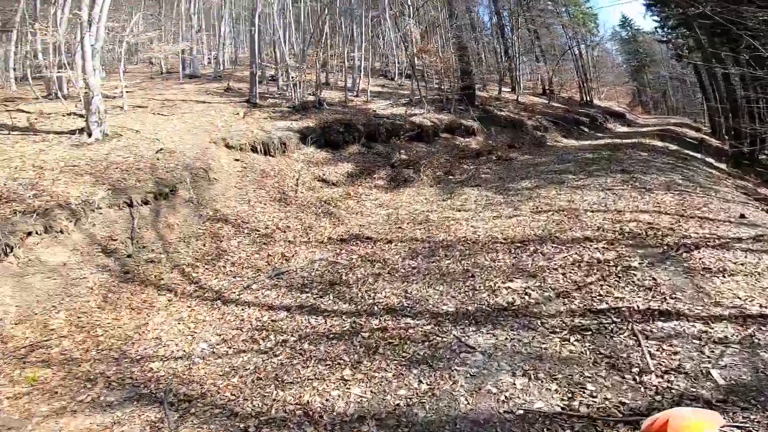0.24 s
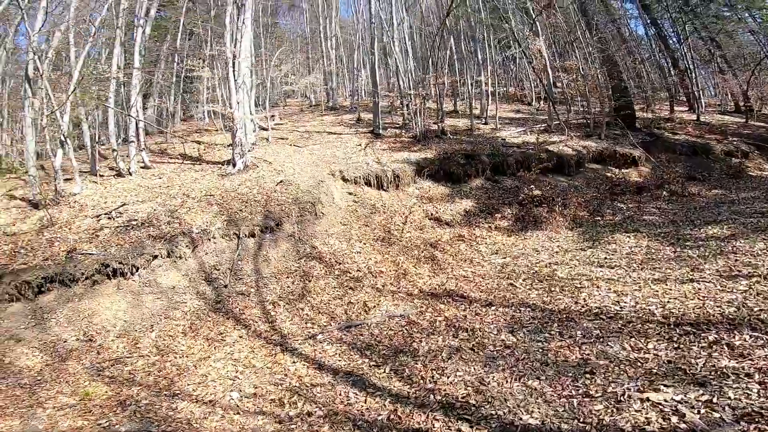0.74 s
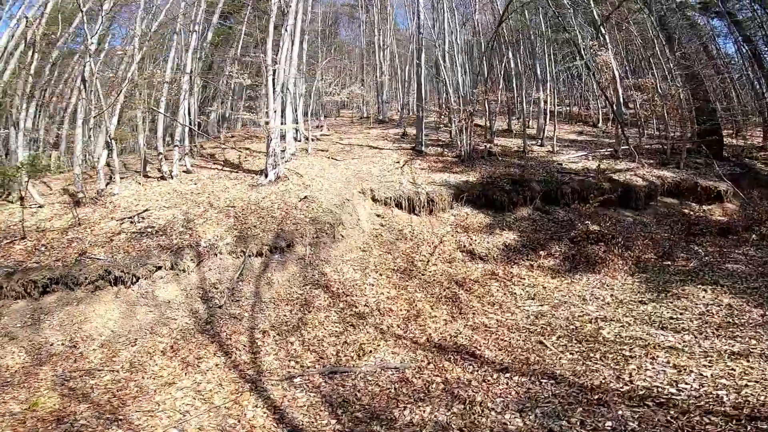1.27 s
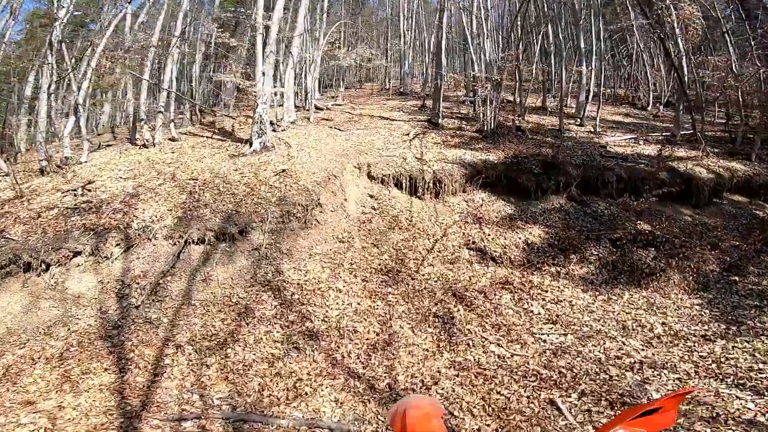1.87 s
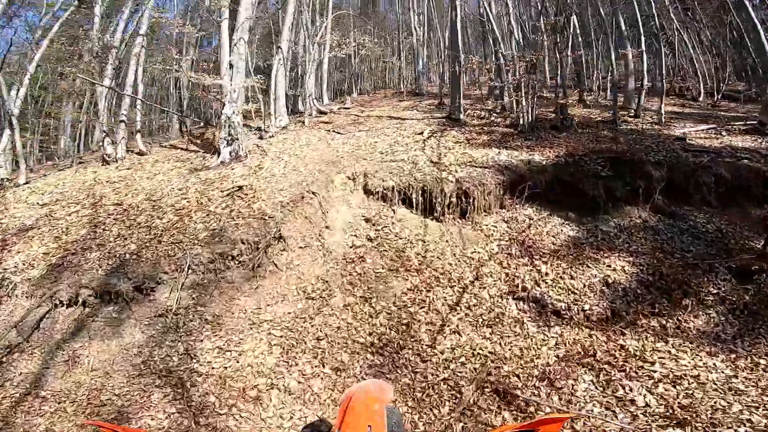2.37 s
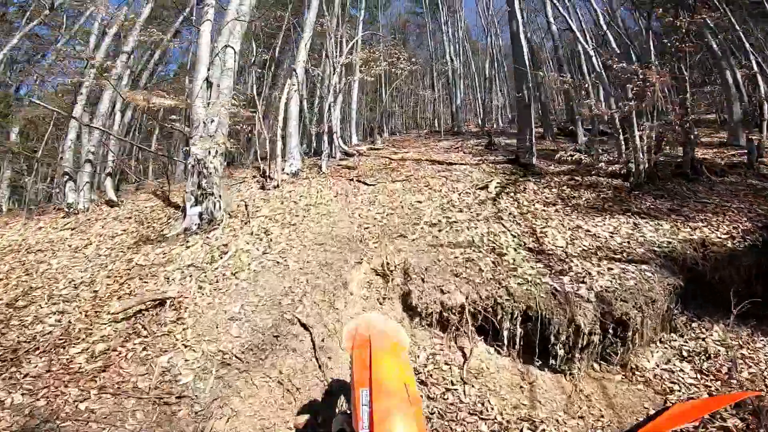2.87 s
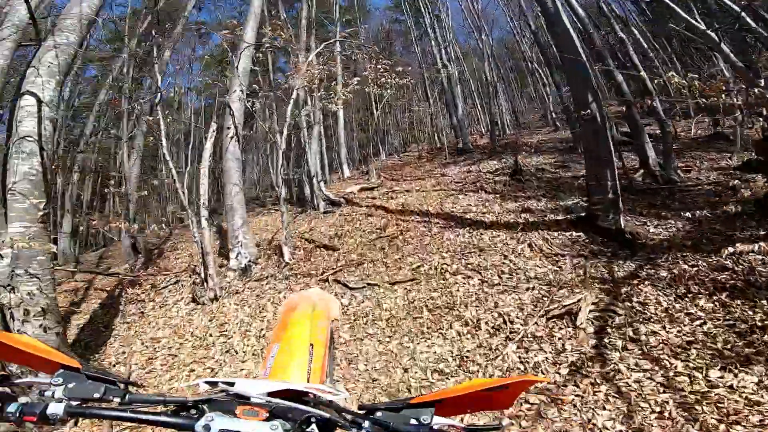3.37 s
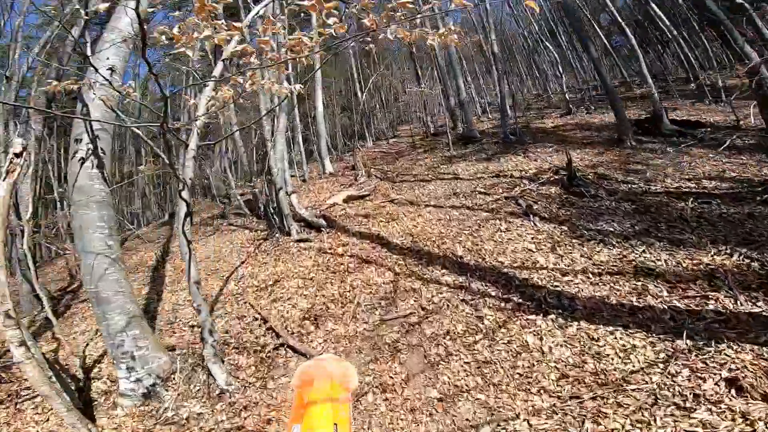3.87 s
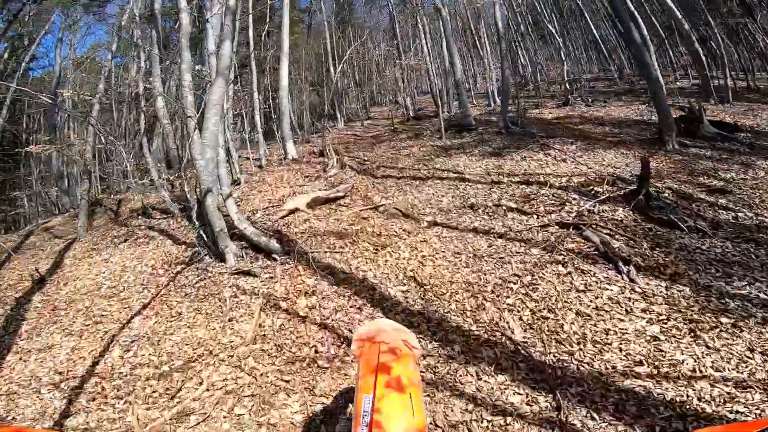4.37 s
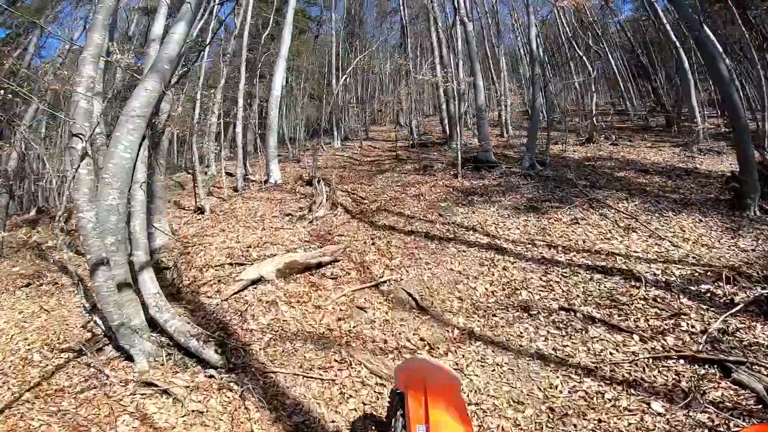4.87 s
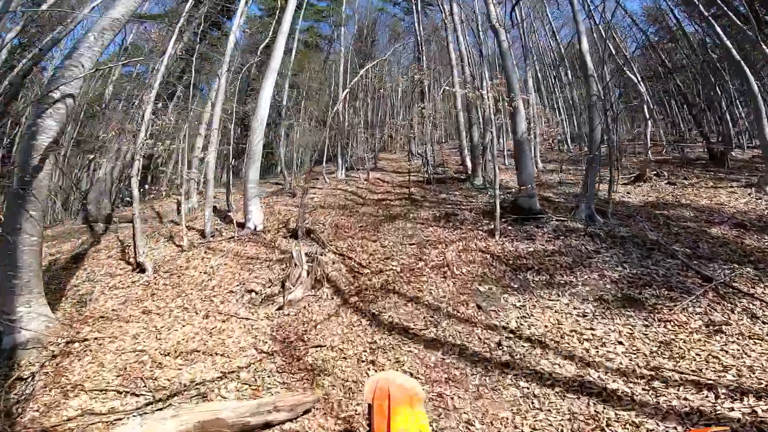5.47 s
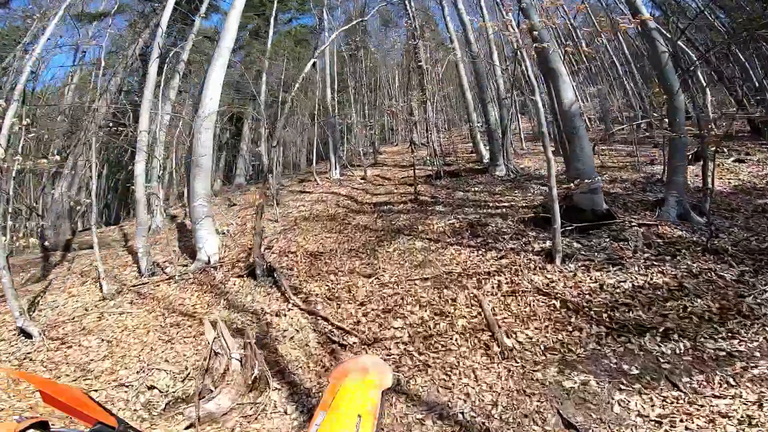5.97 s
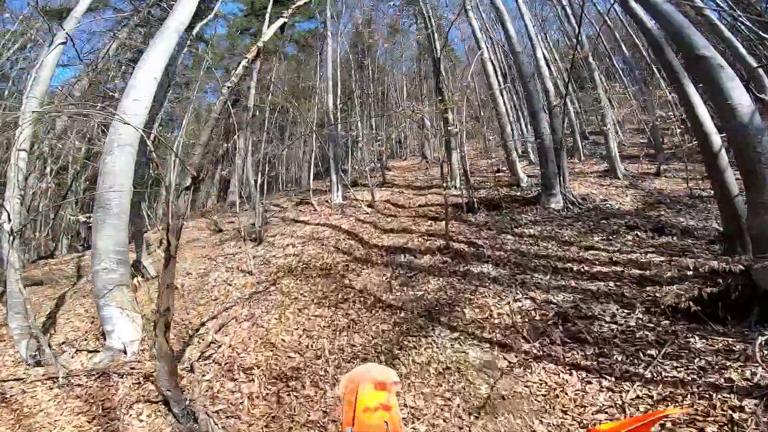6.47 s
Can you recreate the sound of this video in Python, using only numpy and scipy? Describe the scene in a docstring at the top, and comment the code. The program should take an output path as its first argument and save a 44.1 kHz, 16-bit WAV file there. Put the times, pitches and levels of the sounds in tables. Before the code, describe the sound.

A two-stroke dirt bike pops slowly near idle, then revs up and down in raspy surges, tyres rustling through dry leaves, heard from the rider's helmet.

```python
"""A two-stroke enduro bike climbs a leafy forest slope, heard from the rider's helmet.
It chugs near idle with single pops, then revs up and down: every turn of the crank sends pulses
through airbox and exhaust, and makes piston, cylinder, pipe wall and crankcase clatter and ring.
The tyres rustle as filtered noise in fine grains, over a dull noise rumble; chain and chassis knock
as short bursts of noise."""
import sys
import numpy as np
from scipy import signal
from scipy.fft import rfft, irfft, next_fast_len
from scipy.io import wavfile
from scipy.ndimage import uniform_filter1d

SR = 44100
rng = np.random.default_rng(int(sys.argv[2]) if len(sys.argv) > 2 else 0)


def to_wav(s):
    """Save 16-bit WAV."""
    ch = np.atleast_2d(s).T  # columns
    pcm = np.round(np.clip(ch, -1, 1) * 32767)  # PCM
    wavfile.write(sys.argv[1], SR, pcm.astype(np.int16))


N = 296345
TIME = np.arange(N) / SR   # seconds

# Lone firings near idle. Each row: start in seconds, strength in dB before the pop's own gain.
LONE_FIRINGS = [(0.161, -14.5), (0.331, -13.5), (0.485, -9.5), (0.638, -9.5), (0.749, -8.5), (0.855, -6.5),
                (0.928, -18), (0.965, -10.5)]
# How the two microphone ports differ. Each row: frequency in Hz, likeness from 0 to 1,
# left minus right in dB, lead of the left in radians.
PORT_DIFFERENCES = [(100, 0.998, 0.1, 0.048), (250, 0.998, -0.05, 0.08), (500, 1, 1, 0.33),
                    (770, 0.92, 3, 0.29), (1080, 1, 4.5, -0.86), (1360, 0, 3.5, 0.059), (1860, 1, 3, -1.22),
                    (2540, 0.93, 1, 0.72), (3550, 0.91, 3, -0.22), (5000, 0.89, 1.5, -0.81),
                    (7000, 0.3, 0.5, 0.66), (9100, 1, 2.5, 1.43)]
# Effort of the engine, heard as the boom of its airbox. Each row: time in seconds, level in dB before trims.
ENGINE_EFFORT = [(0, -33.5), (.35, -33), (.92, -24), (1.02, -14), (1.5, -12.5), (2.12, -18.5), (2.3, -14.5),
                 (3.15, -9.5), (3.58, -17.5), (3.72, -14), (4.05, -16), (4.24, -12.5), (4.62, -18.5),
                 (4.9, -14), (6.12, -12), (6.25, -14.5), (6.6, -11), (6.72, -14)]


def from_db(db):
    """Turn decibels into a plain gain."""
    return 10 ** (np.asarray(db) / 20)


def rms_one(x):
    """Scale a sound to an rms level of 1."""
    return x / np.sqrt(np.mean(x ** 2) + 1e-20)


def in_time(rows):
    """Draw each column of a time table as a curve with a value at every sample."""
    s, *columns = np.transpose(rows)
    return [np.interp(TIME, s, column) for column in columns]


def per_bin(points, axis=1):
    """Read one column of a spectrum table at every FFT frequency, along a log scale."""
    table = np.transpose(points)
    hz = np.fft.rfftfreq(next_fast_len(N), 1 / SR)
    return np.interp(np.log(hz + 1), np.log(table[0]), table[axis])


def shaped(x, gain):
    """Filter by one gain per FFT frequency."""
    size = next_fast_len(N)
    return irfft(rfft(x, size) * gain, size)[..., :N]


def cut(x, hz, kind, order=2):
    """Smooth low-pass or band-pass filter."""
    return signal.sosfilt(signal.butter(order, hz, kind, fs=SR, output="sos"), x)


def evened(x, size=3500):
    """Hold the slow level near rms 1 but keep the single pulses; size is in samples."""
    power = uniform_filter1d(uniform_filter1d(x ** 2, size), size)
    return x / np.sqrt(np.abs(power) + 1e-12)


def drift(rate):
    """Random wandering with rms 1: chance points, so many a second, joined by straight lines."""
    return rms_one(np.interp(TIME * rate, np.arange(4000), rng.standard_normal(4000)))


def resonate(x, modes):
    """Ring resonances side by side with alternating signs; modes hold Hz, width in Hz, dB."""
    out = 0
    for k, (hz, width, db) in enumerate(modes):
        r = np.exp(-np.pi * width / SR)
        poles = [1, -2 * r * np.cos(2 * np.pi * hz / SR), r * r]
        ring = (1 - r * r) / 2 * signal.lfilter([1, 0, -1], poles, x + 1e-18)
        out = out + (-1) ** k * from_db(db) * ring
    return out


def voiced(source, modes, band_hz, level):
    """Ring a group of resonances, keep their band and follow their level curve."""
    return from_db(in_time(level)[0]) * evened(cut(resonate(source, modes), band_hz, "band"))


def stereo_noise():
    """Two channels of noise, as alike at each frequency as the port table says."""
    alike = np.clip(per_bin(PORT_DIFFERENCES), 0, .999)
    mid, side = rng.standard_normal((2, N))
    return mid + shaped(side, np.sqrt((1 - alike) / (1 + alike))) * np.array([[1], [-1]])


def per_turn(turns):
    """One bell-curve random number held for each turn of the crank."""
    return rng.standard_normal(1000)[np.floor(turns).astype(int) + 2]


def impulses(rows):
    """One single-sample click for each row of seconds and dB."""
    clicks = np.zeros(N)
    for s, db in rows:
        clicks[round(s * SR)] = from_db(db)
    return clicks


def dying(clicks, decay_s):
    """An exponential fade after each click."""
    return signal.lfilter([1], [1, -np.exp(-1 / (decay_s * SR))], clicks + 1e-18)


def crank_speed():
    """Turns per second: the rider's revs, with a short lurch after every lone firing."""
    # Each row: time in seconds, crank speed in turns per second before the lurches.
    rider_revs = [(0.0, 43.47), (0.12, 25.12), (0.29, 21.23), (0.45, 22.98), (0.53, 25.38), (0.62, 22.02),
                  (0.78, 26.77), (0.93, 18.97), (1.12, 34.97), (1.4, 60.44), (1.56, 63.54), (1.8, 50.13),
                  (1.92, 39.38), (2.0, 36.14), (2.12, 36.34), (2.28, 42.82), (2.52, 44.63), (2.76, 52.07),
                  (2.88, 64.63), (2.96, 67.22), (3.04, 67.65), (3.24, 60.3), (3.4, 56.1), (3.44, 60.59),
                  (3.48, 55.99), (3.6, 44.26), (3.64, 44.8), (3.72, 49.62), (3.76, 50.59), (3.8, 46.42),
                  (3.96, 43.77), (4.0, 46.84), (4.08, 43.43), (4.12, 48.8), (4.16, 60.16), (4.2, 62.12),
                  (4.28, 50.83), (4.32, 53.59), (4.36, 51.31), (4.4, 42.43), (4.48, 46.72), (4.56, 37.75),
                  (4.64, 33.82), (4.68, 34.3), (4.84, 52.24), (4.92, 51.86), (5.0, 58.63), (5.08, 56.09),
                  (5.28, 54.94), (5.44, 59.59), (5.56, 67.69), (5.64, 72.4), (5.8, 66.22), (5.84, 62.38),
                  (6.0, 65.19), (6.08, 69.5), (6.16, 63.05), (6.2, 56.46), (6.24, 54.17), (6.4, 56.52),
                  (6.52, 60.67), (6.64, 71.33), (6.72, 76.35)]
    kick_revs, kick_s = 6, .022   # turns per second gained, seconds until the top of the kick
    ages = [np.maximum(TIME - s, 0) / kick_s for s, _ in LONE_FIRINGS]
    return in_time(rider_revs)[0] + kick_revs * sum(age * np.exp(1 - age) for age in ages)


def spluttering():
    """How strongly the engine splutters as the throttle snaps shut or open."""
    # Each row: middle in seconds, half length in seconds, strength from 0 to 1.
    splutters = [(3.531, 0.068, 1), (4.196, 0.051, 0.36), (4.748, 0.039, 0.5), (5.005, 0.022, 0.7),
                 (6.184, 0.04, 0.48)]
    return sum(depth * np.exp(-((TIME - s) / length) ** 2) for s, length, depth in splutters)


def gas_pulses(angle, throttle, smear, share, count):
    """One pulse a turn from crank orders, spread over the angle as the ports open and close."""
    # Port timing favours some crank orders (multiples of the crank speed), one row each from the third up.
    # Each row: dB at open throttle, dB at closed throttle, both before weighting by throttle and share.
    order_gains = [(-2.5, 9), (18, 2.5), (10, 3.5), (-16, 7), (13, -0.5), (7.5, 3.5), (-0.5, 6),
                   (-5.5, -1.5)]
    gains = [from_db(share * (throttle * open_db + (3.0 - throttle) * shut_db))
             for open_db, shut_db in order_gains]
    gains += [from_db(1.0)] * count   # the higher orders are even
    orders = zip(range(3, count), gains)
    return rms_one(sum(gain * np.cos(k * angle - smear * (k - 5) ** 2 / 2) for k, gain in orders))


def pumping(angle, revs, ragged, splutter):
    """The piston pumps smoothly once and twice a turn, through the standing waves of the pipe."""
    # The engine lugs out of the hollow, which swells its pumping. Each row: time in seconds, gain in dB.
    lug = [(0, 4), (1.1, -2.5), (1.7, -1), (2.1, -2), (2.8, -1), (3.2, -11), (3.7, -3), (4.4, -4.5),
           (5.0, -3.5), (6.72, -8)]
    # Strength once a turn. Each row: frequency in Hz, dB against effort plus lug.
    once_a_turn = [(27, -11.5), (45, -16), (58, -14.5), (72, -24)]
    # Strength twice a turn. Each row: frequency in Hz, dB against effort plus lug.
    twice_a_turn = [(50, -11), (70, -3.5), (90, -6), (108, -8), (122, -14.5), (138, -6.5)]
    base_db = in_time(ENGINE_EFFORT)[0] + in_time(lug)[0]
    first_db = base_db + np.interp(revs, *np.transpose(once_a_turn))
    second_db = base_db + np.interp(2 * revs, *np.transpose(twice_a_turn))
    pump = np.sqrt(2) * (from_db(second_db) * np.sin(2 * angle) + from_db(first_db) * np.cos(angle))
    waver_db = .6 + .6 * ragged + 2.5 * splutter
    return pump * from_db(waver_db * drift(40))


def airbox_boom(angle, strength, throttle, turbulence):
    """Long intake gulps and rushing air ring in the airbox."""
    # Each row: frequency in Hz, width in Hz, relative gain in dB.
    airbox_modes = [(239.9, 59, 3), (300.3, 49, 4.5), (321.8, 50.5, -1)]
    intake_turn = 0.021   # the intake runs ahead, in turns
    hollow_hz, hollow_width_hz = 156, 45
    boom_trim_db = -0.1
    smear = 0.048 - 0.46 * (1 - throttle) ** 2
    gulps = strength * gas_pulses(angle + 2 * np.pi * intake_turn, throttle, smear, 0.83, count=13)
    # the airbox is hollow below its main resonance
    notch = signal.iirnotch(hollow_hz, hollow_hz / hollow_width_hz, fs=SR)
    intake = signal.lfilter(*notch, gulps + 1.7 * turbulence)
    boom = evened(cut(resonate(intake, airbox_modes), 586, "low"))
    return from_db(in_time(ENGINE_EFFORT)[0] + boom_trim_db) * boom


def exhaust_honk(pulses, turbulence):
    """Short exhaust pulses and turbulence honk in the pipe near 470 Hz."""
    # Each row: frequency in Hz, width in Hz, relative gain in dB.
    honk_modes = [(377.5, 49, 2), (518, 57, 3.2)]
    # Each row: time in seconds, level in dB before the trim.
    honk_level = [(0.0, -35), (0.41, -41.5), (0.49, -31), (0.52, -35), (0.65, -33.5), (0.82, -39),
                  (0.86, -25), (0.88, -35.5), (1.31, -25), (1.57, -19), (1.91, -39.5), (2.92, -23),
                  (3.42, -25.5), (3.46, -42), (4.32, -22), (4.38, -30), (4.7, -35.5), (4.88, -18.5),
                  (5.09, -28.5), (5.2, -22.5), (5.99, -23), (6.12, -28.5), (6.29, -24.5), (6.72, -26)]
    honk_trim_db = -2
    return from_db(honk_trim_db) * voiced(pulses + turbulence, honk_modes, [360, 620], honk_level)


def pipe_drone(pulses, angle, revs, idling):
    """A hollow tone of the pipe; at low revs it also sings at nine times the crank speed."""
    # Each row: frequency in Hz, width in Hz, relative gain in dB.
    drone_modes = [(324, 40, 0)]
    # Each row: time in seconds, level in dB.
    drone_level = [(0, -41.5), (1.0, -27.5), (1.3, -31), (1.5, -22.5), (1.95, -34), (2.2, -20.5),
                   (2.8, -31), (3.6, -27), (3.749, -26.5), (4.45, -23.5), (4.62, -18), (4.8, -21),
                   (5.1, -30.5), (6.72, -31.5)]
    singing = np.clip(42 - revs, 0, 4) / 4 * (1 - idling) * np.cos(9 * angle)
    return voiced(.5 * pulses + singing, drone_modes, [270, 390], drone_level)


def fronts(angle):
    """The steep front of each exhaust pulse: a dense, even stack of crank orders."""
    smear = .035
    return rms_one(sum(np.cos(k * angle - smear * (k - 5) ** 2 / 2) for k in range(6, 72)))


def echoed(x):
    """The silencer points backwards and is also heard off the ground and trunks, along wandering paths."""
    # Each row: average delay in seconds, level in dB.
    reflections = [(.0043, -7), (.0079, -8), (.0131, -11)]
    wander_s = .0005
    return x + sum(from_db(db) * np.interp(TIME - s - wander_s * drift(2), TIME, x)
                   for s, db in reflections)


def silencer(buzz, turbulence, throttle):
    """Pulse fronts bark and rasp in the silencer, brighter at open throttle, and buzz the steel pipe."""
    # Resonances of each voice. Each row: frequency in Hz, width in Hz, relative gain in dB.
    bark_modes = [(614, 82, 0.71), (731.6, 36.5, 1.4)]
    open_bark_modes = [(770, 150, 0), (900, 140, -3)]
    rasp_modes = [(870, 300, 0.36), (1058, 105, 1.5), (1156, 38, 0.32), (1420, 33, -1.9)]
    nasal_modes = [(1361, 20, 0)]
    shell_modes = [(1860, 85, 11), (2064, 91, 5), (2690, 300, -5), (3800, 350, -1.5)]
    # Level of the bark near 700 Hz, the rasp above it, the nasal tone strong in the first rev, and the
    # metallic buzz of the steel pipe under load. Each row: time in seconds, level in dB.
    bark_level = [(0.0, -41), (0.17, -29.5), (0.29, -42), (0.34, -35.5), (1.14, -30), (1.35, -22.5),
                  (1.53, -28.5), (1.74, -21.5), (1.91, -33), (2.81, -25.5), (2.84, -30.5), (3.07, -26),
                  (3.18, -34), (3.39, -27.5), (3.59, -37.5), (3.74, -27), (3.84, -32), (4.02, -29),
                  (4.09, -37), (4.14, -24), (4.19, -33), (4.25, -29), (4.34, -29.5), (4.42, -40),
                  (5.2, -27), (5.41, -30), (5.74, -24), (5.84, -31.5), (6.32, -25), (6.53, -31),
                  (6.72, -27)]
    rasp_level = [(0, -56), (1.0, -47), (1.3, -39), (1.55, -35.5), (1.9, -46), (2.3, -39), (2.7, -40),
                  (2.8, -35), (2.95, -39), (3.35, -33.5), (3.55, -53), (4.2, -43), (4.6, -48), (5.0, -37),
                  (5.27, -42), (5.62, -31), (5.85, -39), (6.2, -40), (6.72, -36)]
    nasal_level = [(0, -49), (1.2, -45.5), (1.52, -35.5), (1.7, -39.5), (1.95, -61), (3.0, -45), (3.6, -64),
                   (5.6, -59), (6.72, -56)]
    shell_level = [(0, -65), (1.5, -50), (1.9, -52), (2.35, -40), (2.75, -40), (3.0, -38), (3.3, -39),
                   (3.55, -56), (4.9, -52), (5.2, -38.5), (5.45, -42), (5.65, -33), (5.85, -40), (6.2, -42),
                   (6.72, -35)]
    gas = buzz + (1.4 - .6 * throttle) * turbulence
    throat = resonate(gas, bark_modes) + throttle * resonate(gas, open_bark_modes)
    bark = from_db(in_time(bark_level)[0]) * evened(cut(throat, [540, 1040], "band"))
    source = buzz + .4 * turbulence
    rasp = voiced(source, rasp_modes, [820, 1450], rasp_level)
    nasal = voiced(source, nasal_modes, [1250, 1550], nasal_level)
    shell = voiced(source, shell_modes, [1650, 4500], shell_level)
    return bark + rasp + nasal + shell


def firing_engine(turns, revs, throttle):
    """Uneven firings drive airbox, pipe and silencer; their strength varies from turn to turn."""
    port_turn, front_turn = 0.059, 0.0811   # delays of the pulses and of their fronts, in turns
    ragged = 1 - throttle
    splutter = spluttering()
    idling = np.clip((33 - revs) / 5, 0, 1)
    cycle = turns - port_turn
    jitter_turn = .006 * ragged + .001 + .04 * splutter
    angle = 2 * np.pi * (cycle + jitter_turn * drift(45))
    uneven_db = -1.6 + 2.4 * ragged + 3.5 * splutter
    strength = from_db(uneven_db * np.clip(per_turn(cycle + .5), -2, 2))
    # in a splutter every other charge burns weakly
    strength = strength * (1 + .5 * splutter * np.cos(angle / 2))
    pulses = strength * gas_pulses(angle, throttle, smear=0.058, share=.35, count=29)
    # each puff of gas carries turbulence, more so when the mixture burns badly or the engine idles
    puff = 1 + .5 * np.cos(angle - 1)
    roughness = .4 + .6 * ragged ** 2 + 2.2 * splutter + 1.5 * idling
    turbulence = roughness * puff * rng.standard_normal(N)
    # a coasting engine lights each charge a little early or late, and more or less hard
    late = front_turn + .006 * ragged * per_turn(cycle + .5)
    front_strength = strength * from_db(2 * ragged * per_turn(cycle + .5))
    buzz = (1 - 0.78 * idling) * front_strength * fronts(angle - 2 * np.pi * late)
    intake = pumping(angle, revs, ragged, splutter) + airbox_boom(angle, strength, throttle, turbulence)
    pipe = exhaust_honk(pulses, turbulence) + pipe_drone(pulses, angle, revs, idling)
    return intake + pipe + silencer(echoed(buzz), turbulence, throttle)


def clatter(turns, revs, level_db):
    """The piston slaps and rattles the cylinder once a turn; whirring gears take over at high revs."""
    # Each row: frequency in Hz, width in Hz, gain in dB before it varies by turn.
    cylinder_modes = [(1006, 270, 3.5), (1855, 265, 4.5), (2323, 264, 6), (2850, 346, 3), (3560, 420, 2),
                      (5090, 960, -8.5)]
    lead_s, rise_s, decay_s = 0.013, 0.006, 0.003
    whirr, fuse_revs = 0.044, 58   # share of the gears, turns per second where their whirr has doubled
    uneven_db, colour_db, trim_db = -1.5, 2.0, -2.5
    cycle = turns + lead_s * revs
    age = cycle % 1 / revs   # seconds since the slap
    slap = (1 - np.exp(-(age / rise_s) ** 2)) * np.exp(-age / decay_s)
    slap = slap * from_db(uneven_db * per_turn(cycle))
    gears = whirr * (1 + (revs / fuse_revs) ** 4)
    noise = stereo_noise()
    # every turn colours the rattle afresh
    rattle = sum(resonate(noise, [mode]) * (-1) ** k * from_db(colour_db * per_turn(cycle))
                 for k, mode in enumerate(cylinder_modes))
    return from_db(level_db + trim_db) * evened(slap + gears) * rms_one(rattle)


def chamber(turns, revs, throttle, level_db, ring, spread):
    """Each turn pings the thin expansion chamber, at a pitch that varies less under load."""
    lead_s, rise_s, decay_s = 0.0102, 0.0013, 0.006
    uneven_db = 2.1
    hz, ring_db = in_time(ring)
    cycle = turns + lead_s * revs
    age = cycle % 1 / revs   # seconds since the ping
    swell = (1 - np.exp(-(age / rise_s) ** 2)) * np.exp(-age / decay_s)
    swell = swell * (1 - (cycle % 1) ** 10)   # close each turn softly
    loose = 1 - .6 * throttle
    bent_age = age + loose * spread * per_turn(cycle) * (age - rise_s)
    ping = swell * np.sin(2 * np.pi * hz * bent_age + .5 * loose * drift(450))
    return from_db(level_db + ring_db) * evened(ping * from_db(uneven_db * per_turn(cycle)))


def crankcase(turns, revs):
    """A duller knock of the crankcase, once a turn."""
    # Each row: frequency in Hz, width in Hz, relative gain in dB.
    case_modes = [(1010, 250, -2), (1210, 54, 7.5), (1230, 85, -3.5)]
    # Each row: time in seconds, level in dB.
    case_level = [(0, -39), (.55, -40), (1.0, -39), (1.4, -50), (2.2, -51), (3.4, -47), (3.6, -52),
                  (4.5, -41), (5.2, -51), (6.72, -48)]
    lead_s, rise_s, decay_s = 0.009, 0.0022, 0.0095
    age = (turns + lead_s * revs) % 1 / revs   # seconds since the knock
    blow = (1 - np.exp(-age / rise_s)) * np.exp(-age / decay_s)
    return from_db(in_time(case_level)[0]) * evened(blow) * rms_one(resonate(stereo_noise(), case_modes))


def engine_metal(turns, revs, throttle):
    """Clatter of the cylinder, two rings of the expansion chamber and the crankcase's knock."""
    # Metallic clatter. Each row: time in seconds, level in dB before trims.
    clatter_level = [(0, -34), (.65, -35.5), (1.0, -34.5), (1.2, -36), (2.1, -35.5), (2.75, -33),
                     (3.0, -35.5), (3.42, -28), (3.58, -41.5), (3.7, -31), (4.95, -29), (5.2, -31),
                     (5.65, -31.5), (5.9, -33.5), (6.2, -27.5), (6.52, -32), (6.72, -26.5)]
    # The chamber's low and high tinny rings. Each row: time in seconds, pitch in Hz,
    # dB against the clatter level.
    low_ring = [(0, 1786, -9), (.42, 1880, -11.5), (.65, 1870, -31), (1.7, 2130, -14), (2.35, 2014, -4.5),
                (2.7, 1773, -4), (3.1, 1860, -12.5), (3.6, 1900, -9), (3.85, 1790, -3), (4.1, 1844, -8.5),
                (4.85, 1747, -8), (5.06, 2020, -5.5), (5.2, 1823, -4.5), (5.45, 1790, -10.5),
                (5.65, 1800, -6), (5.899, 1790, -10), (6.72, 1977, -6.5)]
    high_ring = [(0, 2780, -11.5), (.6, 2466, -11.5), (0.801, 2517, -1.5), (1.1, 2460, -6.5),
                 (1.699, 2335, -8), (2.301, 2740, -15), (3.0, 2755, -6), (3.3, 2630, -11),
                 (3.85, 2464, -12.5), (4.22, 2463, -4.5), (4.7, 2610, -8.5), (4.97, 2690, -4.5),
                 (5.202, 2620, -14.5), (5.4, 2603, -2), (5.75, 2565, -8), (6.02, 2730, -5.5),
                 (6.3, 2570, -15.5), (6.72, 2570, -2)]
    level_db, = in_time(clatter_level)
    pings = chamber(turns, revs, throttle, level_db, low_ring, spread=.008)
    pings = pings + chamber(turns, revs, throttle, level_db, high_ring, spread=.028)
    return clatter(turns, revs, level_db) + pings + crankcase(turns, revs)


def rustle_level():
    """Level of the leaves in dB: the depth of the litter, with a swell for each heap."""
    # From bare track into deep leaves. Each row: time in seconds, level in dB before the leaves' gain.
    litter = [(0, -57.5), (.85, -50), (1.4, -50), (2.0, -53.5), (2.7, -37), (3.05, -42.5), (3.42, -37.5),
              (3.58, -45), (3.8, -38), (6.72, -35.5)]
    # The tyres plough through heaps. Each row: middle in seconds, peak in dB before the leaves' gain.
    heaps = [(.73, -39.5), (4.76, -51.5), (5.149, -38), (6.22, -46)]
    heap_s = 0.026   # half the time through a heap
    swells = sum(from_db(db) * np.exp(-((TIME - s) / heap_s) ** 2) for s, db in heaps)
    return 20 * np.log10(from_db(in_time(litter)[0]) + swells)


def leaves(turns, level_db):
    """Dry leaves crush under the tyres in fine grains of noise that throb a little with the crank."""
    # Each row: frequency in Hz, relative gain in dB.
    leaf_colour = [(900, 8), (1500, 1.5), (2500, -1), (3600, -5), (5000, -3.5), (7000, -3.5), (8200, -3),
                   (9100, 0.5), (10200, -10)]
    grains = from_db(1.5 * drift(550) + 0.5 * drift(25))
    grains = grains * (1 + 0.13 * np.cos(2 * np.pi * (turns - .08)))
    rustle = rms_one(shaped(stereo_noise() * grains, from_db(per_bin(leaf_colour))))
    return from_db(level_db + 4.5) * rustle


def trail():
    """Dull rumble of tyres and of the engine's wash among the trees: noise that wavers slowly."""
    # Each row: frequency in Hz, relative gain in dB.
    trail_colour = [(30, -29), (60, -15.5), (120, 7), (280, -23), (450, -3), (750, -1), (1100, -15),
                    (2000, -35.5), (5000, -58)]
    rumble_db = -37.5 + 1.0 * drift(4.6)
    return from_db(rumble_db) * rms_one(shaped(stereo_noise(), from_db(per_bin(trail_colour))))


def idle_gulps():
    """Between the lone firings, single intake gulps ring short and hollow in the airbox."""
    # Each row: start in seconds, strength in dB before the gain below.
    gulp_times = [(0.015, -22), (0.097, -24), (0.509, -17), (0.663, -14), (0.81, -17.5)]
    # Each row: frequency in Hz, width in Hz, relative gain in dB.
    gulp_modes = [(282, 30, 1), (340, 95, -0.5)]
    gulp_db = 46   # makes up for the weak answer of a resonance to a single click
    return from_db(gulp_db) * cut(resonate(impulses(gulp_times), gulp_modes), 500, "low")


def knocks():
    """Chain and chassis knock over roots and in the jerks of low revs, and a quick run of thumps follows every
    other turn just after 3.5 s: fading bursts of noise."""
    # Each row: start in seconds, strength in dB before the gain below.
    knock_times = [(0.155, -28.5), (0.315, -32), (0.479, -28), (0.632, -25), (0.6928, -30), (0.85, -26.5),
                   (0.956, -30), (1.028, -28), (3.517, -19), (3.557, -20), (3.5988, -19), (3.647, -19.5),
                   (4.7503, -15), (5.137, -34), (6.179, -21)]
    # Each row: frequency in Hz, relative gain in dB.
    knock_colour = [(600, -9), (1500, 14.5), (3500, 10.5), (6000, 2), (9000, 7), (10500, -3.5)]
    knock_db, decay_s = -8.0, 0.01
    noise = rms_one(shaped(stereo_noise(), from_db(per_bin(knock_colour))))
    return from_db(knock_db) * dying(impulses(knock_times), decay_s) * noise


def idle_pops():
    """Each lone firing near idle is a dry pop of randomly varied colour and a puff of gas."""
    # Each row: frequency in Hz, width in Hz, gain in dB before it varies.
    pop_modes = [(87.6, 8.1, 8), (244, 62, 1.5), (428, 690, -4), (660, 220, -7.5)]
    pop_db, colour_db = 37.5, 2.5
    puff_db, puff_s = -12, 0.0076
    clicks = impulses(LONE_FIRINGS)
    ring = sum((-1) ** k * resonate(clicks * from_db(pop_db + colour_db * drift(12.1)), [mode])
               for k, mode in enumerate(pop_modes))
    gas = rms_one(cut(rng.standard_normal(N), [200, 800], "band"))
    puff = from_db(puff_db) * dying(clicks, puff_s) * gas
    return cut(ring, 720, "low", order=3) + puff


def scene():
    """The crank angle times the running engine's sounds; the ground adds its own."""
    # The twist grip. Each row: time in seconds, throttle from 0 (shut) to 1 (open).
    twist_grip = [(0, 0), (1.0, 0.55), (1.5, 0.43), (1.72, 0.25), (2.12, 0.21), (2.3, 0.89), (3.42, 0.9),
                  (3.52, 0.4), (4.1, 0.34), (4.2, 0.6), (4.3, 0.1), (4.6, 0.31), (4.95, 0.36), (5.1, 0.84),
                  (6.14, 0.95), (6.2, 0.4), (6.27, 0.77), (6.72, 1)]
    revs = crank_speed()
    throttle = np.clip(in_time(twist_grip)[0], 0, 1)
    turns = np.cumsum(revs) / SR + .94   # the crank starts at .94 of a turn
    engine = firing_engine(turns, revs, throttle) + engine_metal(turns, revs, throttle)
    ground = leaves(turns, rustle_level()) + trail()
    return engine + ground + idle_gulps() + knocks() + idle_pops()


def record(dry):
    """The two ports differ in level and phase; the top is cut above 10500 Hz."""
    half_level = from_db(per_bin(PORT_DIFFERENCES, axis=2) / 2)
    half = half_level * np.exp(.5j * per_bin(PORT_DIFFERENCES, axis=3))
    ports = shaped(dry, np.array([half, 1 / half]))
    return signal.sosfilt(signal.ellip(10, .2, 80, 10500, fs=SR, output="sos"), ports)


dry = scene()
out = record(dry)
to_wav(out)
```